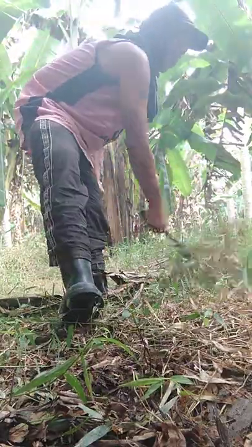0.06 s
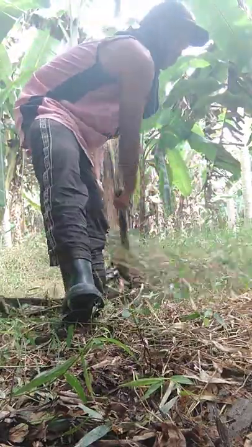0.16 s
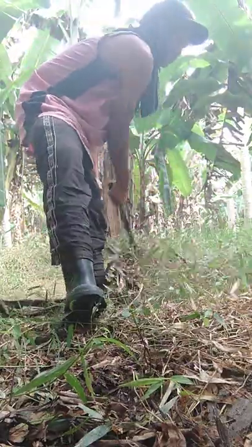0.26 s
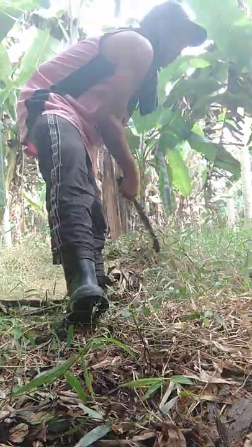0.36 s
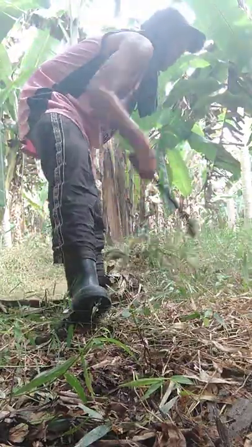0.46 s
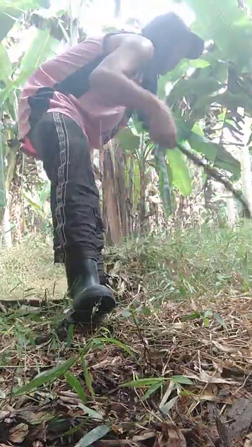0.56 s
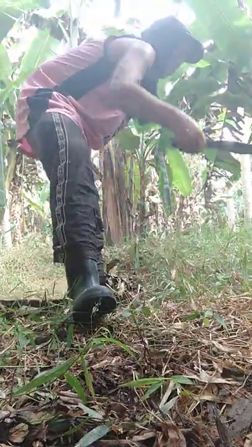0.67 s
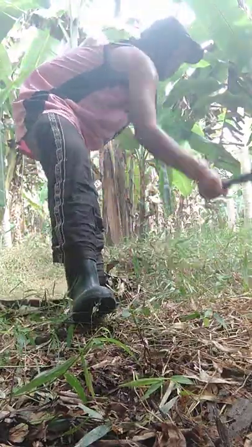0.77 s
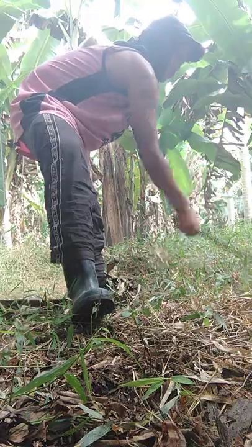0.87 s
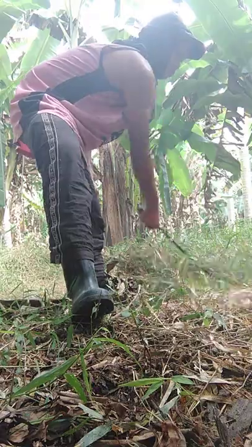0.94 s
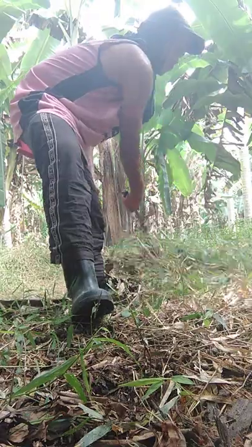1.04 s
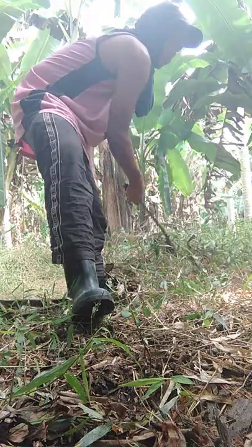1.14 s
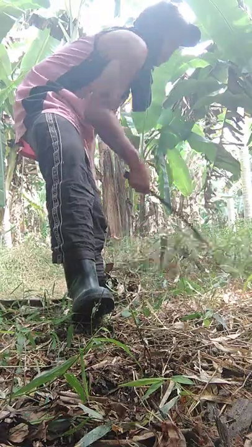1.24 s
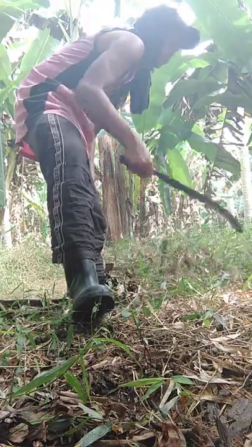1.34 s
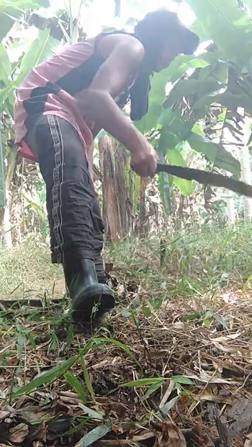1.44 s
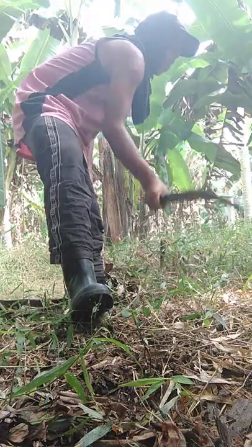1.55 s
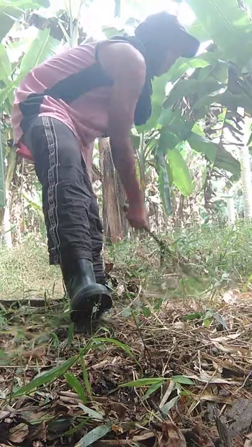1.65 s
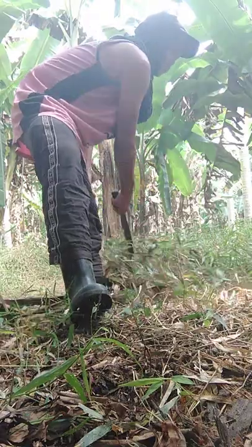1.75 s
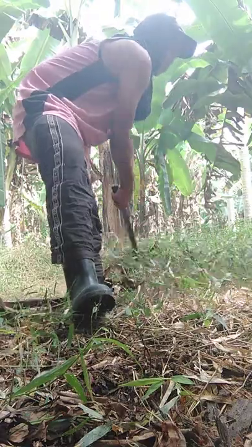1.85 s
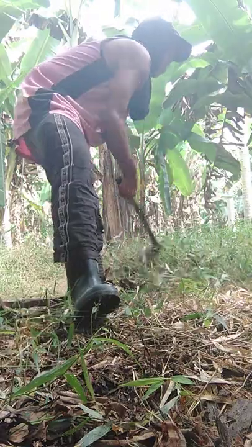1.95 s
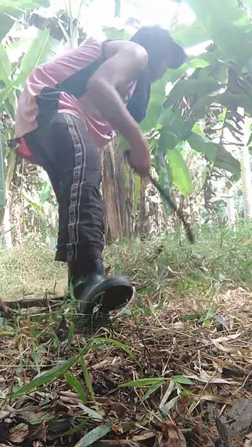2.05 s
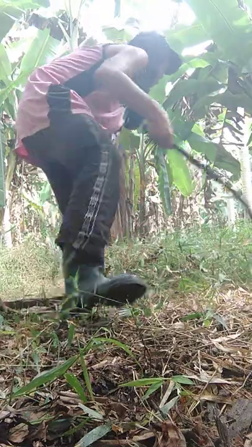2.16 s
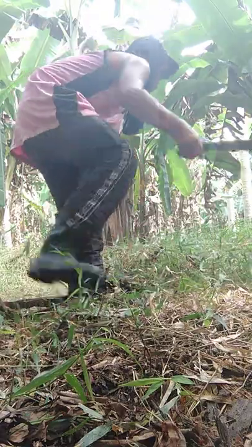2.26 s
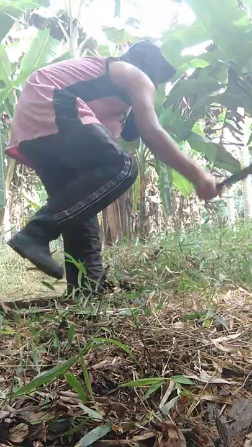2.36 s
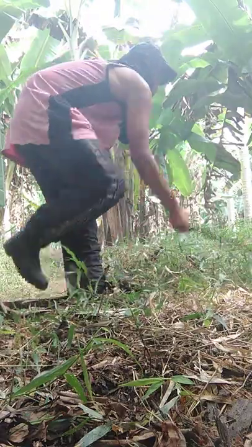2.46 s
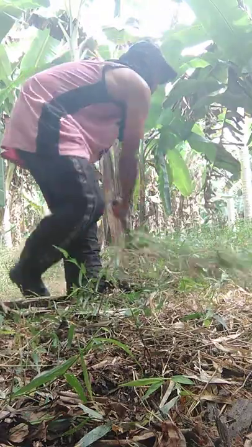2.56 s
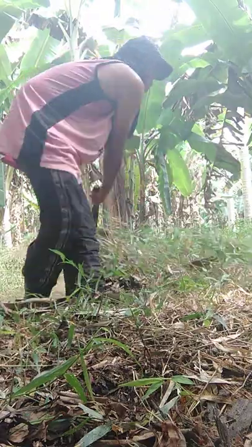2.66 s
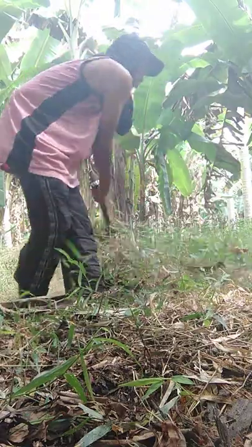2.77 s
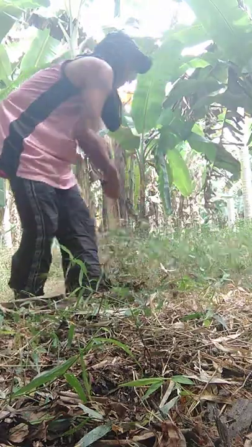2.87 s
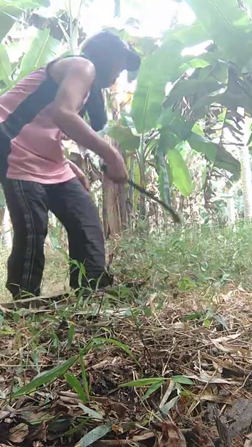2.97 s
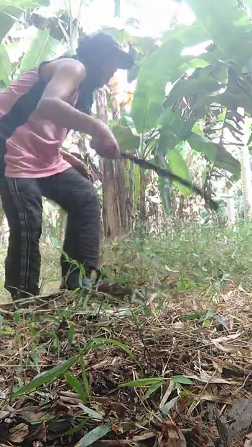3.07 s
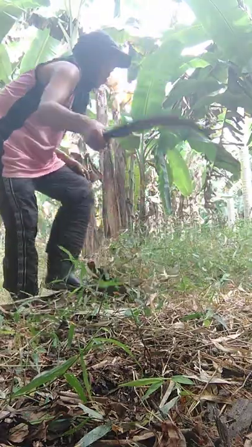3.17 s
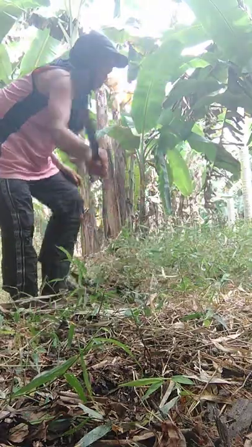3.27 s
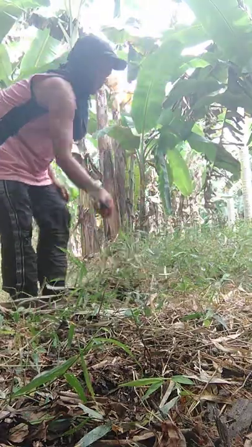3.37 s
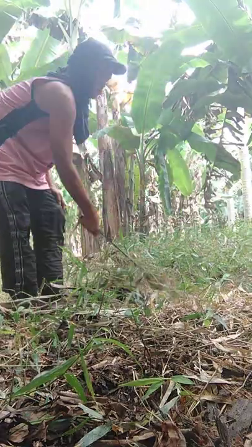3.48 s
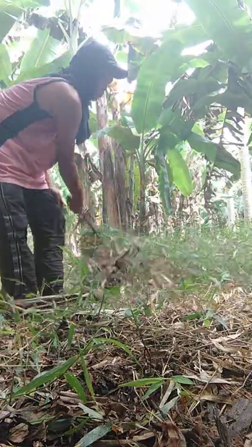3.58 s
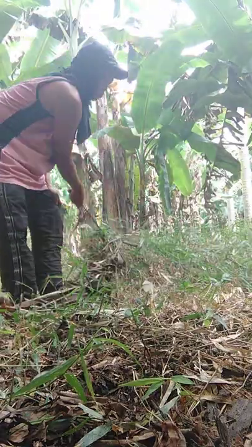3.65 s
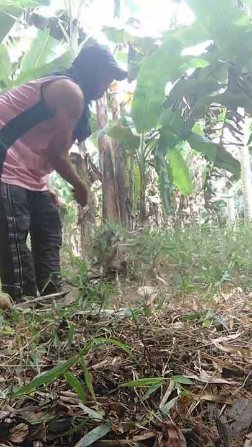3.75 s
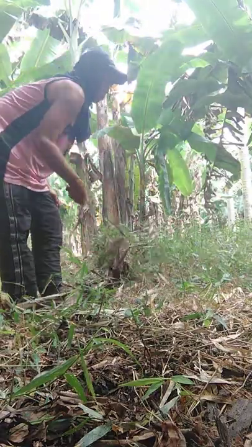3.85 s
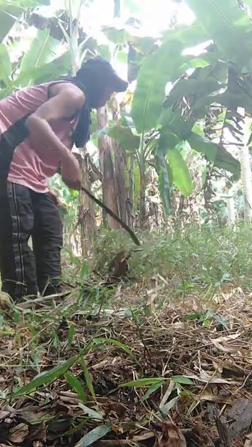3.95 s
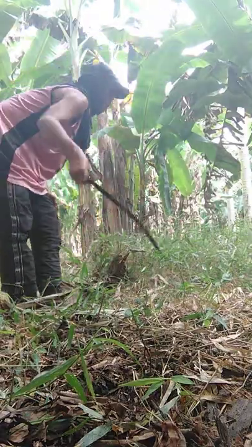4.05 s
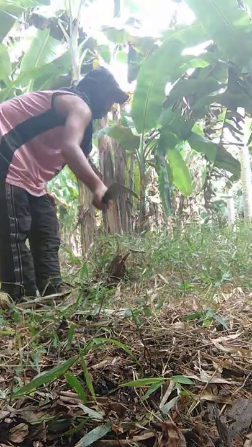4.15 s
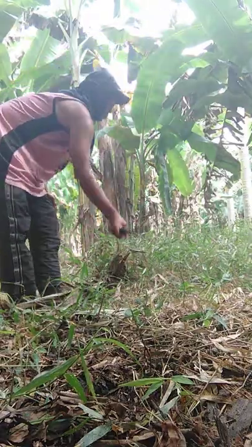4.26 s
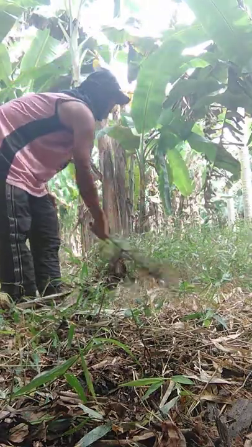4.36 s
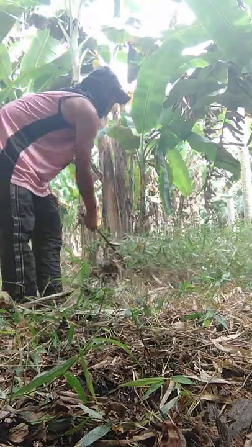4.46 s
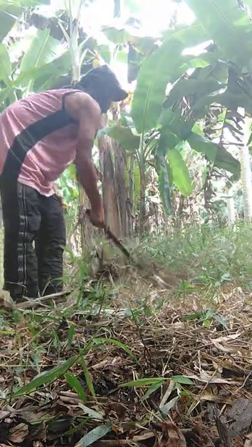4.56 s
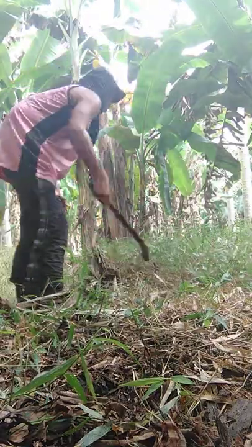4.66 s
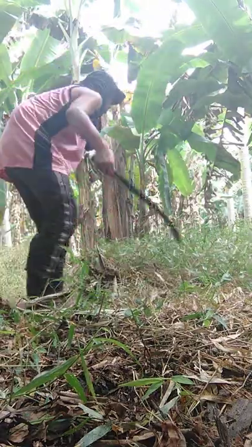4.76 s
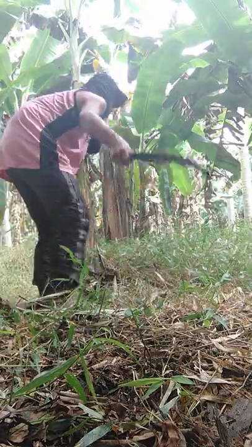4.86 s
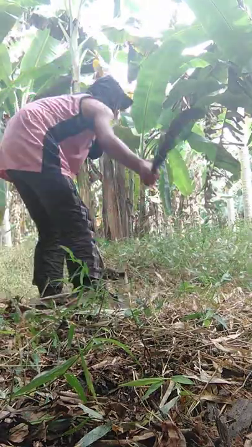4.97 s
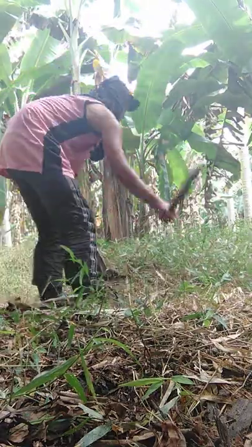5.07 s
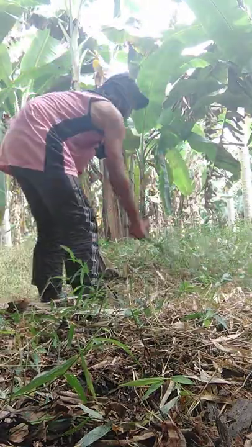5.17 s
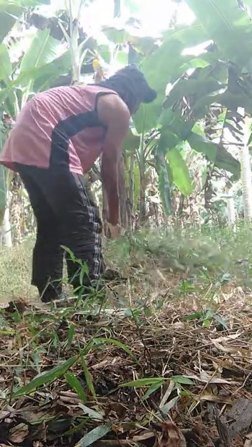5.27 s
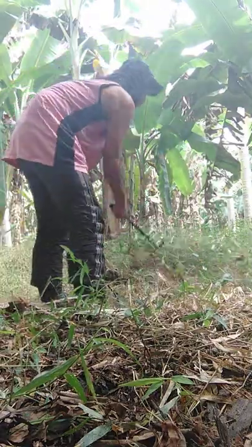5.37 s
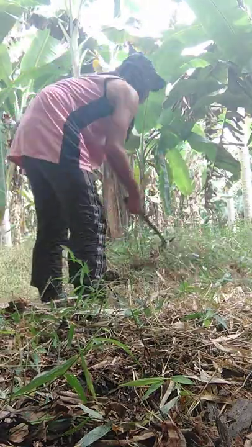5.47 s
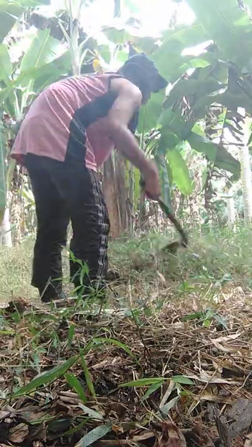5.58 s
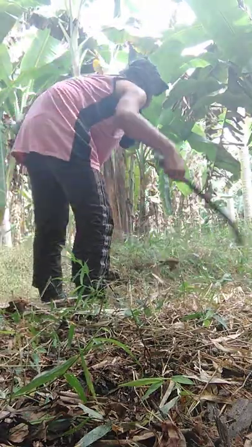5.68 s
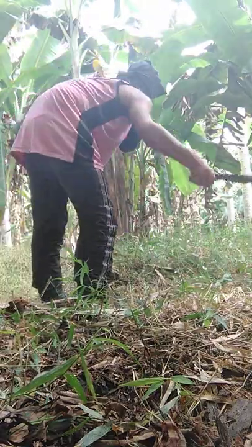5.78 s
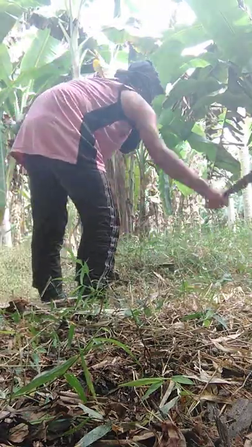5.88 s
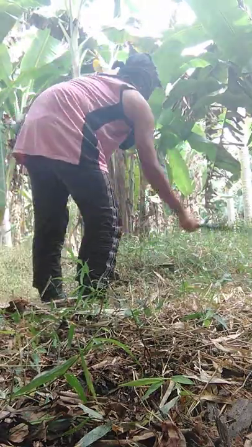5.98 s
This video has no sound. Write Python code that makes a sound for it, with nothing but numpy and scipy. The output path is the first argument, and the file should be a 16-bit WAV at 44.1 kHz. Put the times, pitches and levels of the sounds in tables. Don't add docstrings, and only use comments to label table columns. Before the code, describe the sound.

Close to the ground, crisp swishing chops crunch through dry grass, separated by faint rustles, boot shuffles and two brief insect whines.

```python
import sys
import numpy as np
from scipy import signal
from scipy.fft import rfft, irfft
from scipy.io import wavfile
from scipy.ndimage import uniform_filter1d

SR = 44100
rng = np.random.default_rng(int(sys.argv[2]) if len(sys.argv) > 2 else 0)


def to_linear_factor(level_db):
    exponent = np.asarray(level_db, float) / 20
    return 10 ** exponent


def file_out(sig):
    cols = np.atleast_2d(sig).T
    lim = np.clip(cols, -1, 1)
    pcm = np.round(lim * 32767).astype(np.int16)
    wavfile.write(sys.argv[1], SR, pcm)


N = 265482
STEP, RUN_IN = 40, 2000

# (frequency [Hz], level [dB per Hz])
OPEN_AIR = [(60, -16), (150, -8), (300, -12.5), (800, -23), (1500, -26), (4000, -23.5), (7500, -22),
            (9000, -33), (15500, -43.5)]
# (time [s], level [dB], length [s])
GUSTS = [(0.242, -45.5, 0.086), (0.52, -64.5, 0.036), (0.846, -67.5, 0.053), (0.997, -65, .06),
         (1.51, -67, 0.027), (1.797, -53.5, 0.066), (2.476, -69, 0.029), (2.63, -47, 0.044),
         (3.594, -52.5, 0.044), (3.985, -59, 0.056), (4.363, -64.5, .04), (4.47, -59.5, 0.069),
         (4.925, -67, 0.064), (5.05, -65, .05), (5.232, -59.5, 0.071), (5.33, -66, 0.067),
         (5.846, -66, .04), (5.919, -64, 0.034)]
# (start [s], length [s], level [dB], sag [dB/s],
# brightness [dB])
LEAVES = [(.0, 0.0044, -59, 7, 6), (.05, 0.093, -57.5, -60, 1.5), (.1, 0.0064, -44, 10, 0.5),
          (.38, 0.26, -46.5, 42.5, -0.5), (.973, .006, -45, 6.5, -2), (2.563, .03, -61, 5, 15.5),
          (1.22, 0.27, -47.5, 34.5, -1.5), (1.737, 0.013, -55.5, -100, 6.5), (1.96, 0.24, -51, 48.5, 0.5),
          (2.23, 0.059, -61.5, 4.5, -3.5), (2.85, 0.15, -51, 17, 2), (2.99, 0.093, -51, 16, 4.5),
          (3.1, 0.088, -56.5, 4.5, 3.5), (3.318, 0.011, -46, 2, -6.5), (.66, 0.055, -69, 82, 8.5),
          (4.06, 0.039, -64, 80, 1), (3.8, 0.22, -50.5, 24, -2.5), (4.413, 0.029, -57.5, -300, 9),
          (4.62, .16, -52.5, 33, 1.5), (4.99, 0.038, -63.5, 5.5, -10), (5.278, .008, -57, 5, 4),
          (5.46, 0.11, -50.5, 32, -1.5), (5.57, .12, -52, 22, 4), (5.72, 0.076, -66, 61, 14.5),
          (.15, .03, -42.5, 50, 7), (2.61, 0.14, -43, 70, 10), (2.49, .04, -71, 20, 16),
         (2.26, 0.065, -68.5, 20, 10), (4.96, .05, -68.5, 5, 5), (2.74, 0.087, -51.5, 40, 3),
         (3.6, .02, -34.5, 49.5, -0.5), (5.05, .1, -54, 20, -9), (5.3, .04, -42, 50, 7.5),
         (.44, .08, -57.5, 20, -15), (2, .004, -61, 5, 3)]
# (start [s], length [s], level [dB], sag [dB/s], weight [dB])
BOOTS = [(.98, 0.14, -48, 40.5, 11), (1.5, 0.12, -64, 40, 3.5), (2.563, .03, -64, 7, 11),
         (1.737, .015, -61.5, 9, 9), (4.415, .015, -61.5, -200, 7.5), (3.12, .01, -66, 5, 4),
         (3.19, 0.062, -53, 10, -9), (3.26, .11, -55, -23, -14), (2.718, .1, -58, 40, 7),
         (1.885, .08, -58.5, 40, 7), (3.38, .13, -53, 8, -6.5), (3.7, 0.078, -56.5, 45, 7.5),
         (4.5, 0.12, -58, 57, 6), (5.0, 0.11, -62, 18.5, 4.5)]
# (hiss [dB/s], stems [dB/s], thud [dB/s])
AGEING = (16.5, -16.5, -19.5)
# (contact [s], level at contact [dB], time on to deepest cut [s], level there [dB],
# dying [dB/s])
STROKES = [
    (0.149, -32, 0.063, -24, 134.5),
    (.981, -34.5, .12, -33.5, 114.5),
    (1.757, -35.5, 0.064, -31, 117),
    (2.605, -31, 0.072, -31.5, 120),
    (3.566, -36.5, 0.05, -26.5, 112),
    (4.433, -42, 0.025, -31.5, 97.5),
    (5.028, -48.5, 0.073, -47.5, 141),
    (5.292, -33.5, 0.045, -29, 158),
]
# (frequency
# [Hz], level [dB per Hz])
WEED_COLOUR = [(71, -41), (120, -21.5), (180, -22.5), (225, -4.5), (339, -7), (488, -3), (598, -8.5),
               (780, -7.5), (1190, -19), (3510, -6), (5720, -3), (7450, 1), (12400, -24.5), (15500, -20.5)]
# (time [s], peak [dB], pitch [Hz])
SNAPS = [(0.0616, -35, 7680), (0.09, -34, 7140), (0.107, -34, 4230), (0.5779, -37, 7100),
         (0.9865, -22.5, 3050), (1.0087, -23, 3060), (1.2411, -45, 7390), (1.504, -55, 7210),
         (1.758, -28.5, 7400), (2.2308, -64, 7530), (2.259, -52.5, 7560), (3.0096, -30.5, 6720),
         (3.14, -37, 7090), (3.1617, -38, 6860), (3.2772, -30.5, 7360), (3.3218, -32, 7600),
         (3.4531, -31.5, 7200), (3.478, -37.5, 2670), (3.5673, -17, 7360), (3.9102, -37, 7180),
         (4.427, -33, 6900), (5.0347, -32, 6360), (5.1294, -43, 7400)]
# (time [s], peak [dB], pitch [Hz])
THUDS = [(0.119, -47, 790), (0.143, -31, 244), (0.143, -29.5, 273), (0.982, -19, 910), (1.733, -38, 447),
         (1.75, -47, 291), (1.757, -25.5, 659), (2.56, -39.5, 776), (2.603, -30.5, 675),
         (3.119, -44.5, 530), (3.385, -44.5, 273), (3.379, -41, 590), (3.476, -39, 860),
         (3.565, -34.5, 310), (4.426, -35.5, 663), (4.44, -34.5, 256), (4.44, -36.5, 283),
         (5.008, -50, 456), (5.024, -65, 248), (5.024, -64, 525), (5.11, -49, 744), (5.288, -27, 484)]
# (start [s], level [dB], pitch [Hz], t60 [s])
RUSTLES = [(.195, -31.5, 3380, 0.34), (.98, -43, 1120, 0.36), (1.22, -68, 3500, 0.54),
           (1.54, -57.5, 2310, 0.089), (1.539, -60, 3260, .1), (1.598, -56.5, 5005, 0.11),
           (1.599, -61.5, 7700, 0.12), (2.119, -70, 1480, 0.17), (2.18, -62.5, 2620, 0.24),
           (2.18, -62.5, 1710, 0.089), (2.23, -57, 7600, 0.43), (2.261, -66, 3300, 0.53),
           (2.485, -64, 8500, 0.3), (1.2, -65, 8500, 0.15), (2.56, -55.5, 4515, .2), (3.05, -61, 2550, 1.0),
           (2.945, -48.5, 2480, 0.39), (3.118, -76, 550, 0.059), (3.19, -56, 5300, 0.29),
           (3.38, -55.5, 590, 0.38), (3.6, -45.5, 1700, 0.32), (4.845, -63.5, 2205, 0.35),
           (5.02, -63.5, 1550, 0.23), (5.59, -60.5, 2980, 0.37), (5.29, -35.5, 453, 0.18),
           (5.731, -61, 2300, 0.62), (5.765, -60.5, 4650, 0.28), (5.77, -66.5, 1750, 0.21),
           (2.93, -62, 1890, 0.47), (2.29, -68, 2050, 0.28)]
# (time [s], level [dB], wingbeat whine [Hz])
BUZZES = [
    [(4.12, -70, 7440), (4.156, -49.5, 7300), (4.238, -54, 7200), (4.242, -61, 7320), (4.3, -60.5, 7230),
     (4.4, -95, 7180)],
    [(4.84, -69, 7140), (4.85, -57, 7380), (5.0, -55, 6980), (5.016, -67, 7170), (5.03, -42, 7300)],
]
# (frequency [Hz], level [dB per Hz])
LEARNT = [(300, -93), (800, -100), (1180, -94.5), (1500, -104), (2000, -100), (2600, -102), (3500, -101),
          (4200, -94.5), (5100, -100), (6000, -83.5), (6600, -100), (8500, -102), (12300, -114),
          (15500, -124)]


def at_hz(points, hz):
    table = np.array(points)
    return np.interp(np.log(hz), np.log(table[:, 0]), table[:, 1])


def in_time(rows):
    s, *columns = np.transpose(rows)
    return [np.interp(np.arange(N) / SR, s, column) for column in columns]


def each_sample(slow):
    return np.interp(np.arange(N) / STEP, np.arange(len(slow)), slow)


def rms_one(x):
    return x / np.sqrt(np.mean(x ** 2) + 1e-20)


def slow_drift(rate_hz):
    r = np.exp(-2 * np.pi * STEP * rate_hz / SR)
    white = rng.standard_normal(N // STEP + 2 + RUN_IN)
    return rms_one(signal.lfilter([1], [1, -2 * r, r * r], white)[RUN_IN:])


def drift(rate_hz):
    return each_sample(slow_drift(rate_hz))


def band(x, low_hz, high_hz):
    return signal.sosfilt(signal.butter(2, [low_hz, high_hz], "band", fs=SR, output="sos"), x)


def bank(sources, gain_db):
    edges = np.geomspace(140, 17000, 22)
    out = np.zeros(N)
    for k, (low, high) in enumerate(zip(edges, edges[1:])):
        gain = each_sample(to_linear_factor(gain_db(np.sqrt(low * high))))
        out += gain * band(sources[k % 2], low, high)
    return out


def open_air(level_db=-76.5):
    colour = to_linear_factor(at_hz(OPEN_AIR, np.fft.rfftfreq(N, 1 / SR) + 1))
    return to_linear_factor(level_db) * rms_one(irfft(rfft(rng.standard_normal(N)) * colour, N))


def wind(breeze_db=-70.5, gust_drop_db=21):
    t = np.arange(0, N + STEP, STEP) / SR
    level = np.full(len(t), to_linear_factor(breeze_db))
    for s, db, length in GUSTS:
        level += to_linear_factor(db - gust_drop_db * np.abs(t - s) / length)
    rumble = band(band(rng.standard_normal(N), 72, 150), 49, 190)
    return np.interp(np.arange(N) / SR, t, level) * to_linear_factor(2.0 * drift(20)) * rms_one(rumble)


def settling(t, rows, base, moves, rise_db_per_s=1499, fall_db_per_s=221):
    power = np.zeros((4, len(t)))
    for s, length, level_db, sag, character_db in rows:
        age = t - s
        db = level_db + rise_db_per_s * np.minimum(age, 0) - sag * np.clip(age, 0, length)
        db -= fall_db_per_s * np.maximum(age - length, 0)
        colour = [0 * age]
        for part, move, ageing in zip(base, moves, AGEING):
            colour.append(part + move * character_db + ageing * np.clip(age, 0, 1))
        power += to_linear_factor(2 * (db + colour))
    return power


def strokes(t, approach_db_per_s=2600, contact_s=0.035):
    # (hiss, stems, thud) in dB against the leaf crackle
    at_contact, in_the_cut = (-4.5, -10, -2), (-7, -13.5, -12.5)
    power = np.zeros((4, len(t)))
    for s, contact_db, deep_s, deep_db, dying in STROKES:
        age = t - s
        db = np.interp(age, [0, deep_s], [contact_db, deep_db])
        db += approach_db_per_s * np.minimum(age, 0) - dying * np.maximum(age - deep_s, 0)
        fresh = np.exp(-np.maximum(age, 0) / contact_s)
        colour = [0 * age]
        for first, late in zip(at_contact, in_the_cut):
            colour.append(late + (first - late) * fresh)
        power += to_linear_factor(2 * (db + colour))
    return power


def motion():
    t = np.arange(N // STEP + 2) * STEP / SR
    power = 1e-13 + strokes(t)
    power += settling(t, LEAVES, base=(-3.4, -21, -27), moves=(0.95, -0.72, -0.4))
    power += settling(t, BOOTS, base=(-3, -6, 0), moves=(0.1, 0.25, 0.85))
    leaf_db, *others = 10 * np.log10(power)
    return [leaf_db] + [db - leaf_db for db in others]


def weeds(grains_per_s=5000, uneven_db=1.5, patchy_db=-0.54):
    leaf_db, hiss_db, stem_db, thud_db = motion()
    quiet_db = np.clip(-42 - leaf_db, 0, 20)
    share = each_sample(to_linear_factor(-0.3 * quiet_db))
    patches_db = patchy_db + 0.09 * quiet_db

    born = rng.random((2, N)) < grains_per_s * share * to_linear_factor(2.2 * drift(90)) / SR
    sizes = to_linear_factor(uneven_db * np.minimum(rng.exponential(1, (2, N)), 5))
    sizes *= rng.choice([-1, 1], (2, N))
    grains = rms_one(born * sizes / np.sqrt(share)) + 0.53 * rng.standard_normal((2, N))

    deep_db = thud_db + 7.5 - 0.55 * np.maximum(-48.5 - leaf_db - thud_db, 0)
    anchors = np.log([260, 600, 1800, 4000, 10000])      # Hz, one for each part
    parts = np.array([deep_db, thud_db + 7, stem_db + 15.0, 0 * leaf_db, hiss_db + 2.5])
    parts += leaf_db + 11

    def gain_db(hz):
        shares = [np.interp(np.log(hz), anchors, row) for row in np.eye(5)]
        return at_hz(WEED_COLOUR, hz) + np.dot(shares, parts) + patches_db * slow_drift(16)
    return bank(grains, gain_db)


def burst(hz, cycles):
    turns = np.arange(int(3 * cycles * SR / hz)) * hz / SR
    return np.sin(2 * np.pi * turns) * np.exp(-turns / cycles)


def blows(events, cycles, trim_db):
    out = np.zeros(N + SR)
    for s, db, hz in events:
        ring = to_linear_factor(db + trim_db) * burst(hz, cycles)
        start = round(s * SR)
        out[start:start + len(ring)] += ring
    return band(out[:N], 120, 15000)


def snaps():
    return blows(SNAPS, cycles=1.8, trim_db=2.5)


def crackle(trim_db=-12, t60=0.017):
    clicks = np.zeros(N)
    clicks[[round(s * SR) for s, db, hz in SNAPS]] = [to_linear_factor(db + trim_db) for s, db, hz in SNAPS]
    fade = signal.lfilter([1], [1, -to_linear_factor(-60 / (t60 * SR))], clicks + 1e-18)
    return fade * rms_one(band(rng.standard_normal(N), 3000, 8700))


def thuds():
    return blows(THUDS, cycles=1.9, trim_db=-4.5)


def rustles(width_hz=100, width_share=0.012, trim_db=-0.5):
    out, white = np.zeros(N), rng.standard_normal(N)
    for s, db, hz, t60 in RUSTLES:
        half = width_hz + width_share * hz
        i, edges = round(s * SR), (hz - half, hz + half)
        piece = white[i - RUN_IN:i + SR // 2]
        rough = rms_one(band(band(piece, *edges), *edges)[RUN_IN:])
        fade_db = -60 * np.arange(len(rough)) / SR / t60
        out[i:i + SR // 2] += rough * to_linear_factor(db + trim_db + fade_db)
    flutter = rms_one(uniform_filter1d(uniform_filter1d(white[::-1], size=300), size=300))
    return out * to_linear_factor(3.5 * flutter)


def insect(width_hz=85):
    out, s = np.zeros(N), np.arange(N) / SR
    for rows in BUZZES:
        db, hz = in_time(rows)
        on = np.clip(np.minimum(s - rows[0][0], rows[-1][0] - s) / 0.0049, 0, 1)
        phase = 2 * np.pi * np.cumsum(hz) / SR
        whine = drift(width_hz) * np.cos(phase) + drift(width_hz) * np.sin(phase)
        out += on * to_linear_factor(db) * whine
    return out


def scene():
    cutting = weeds() + snaps() + crackle() + thuds() + rustles()
    return (wind() + cutting + insect())[None]


def suppress(x, floor_db=-26.5, memory=0.9, ragged_db=5.0, close_db=-0.33, lowest_hz=130):
    frame, hop = 512, 128
    hz, s, frames = signal.stft(x, SR, nperseg=frame, noverlap=frame - hop)
    power = uniform_filter1d(uniform_filter1d(np.abs(frames) ** 2, size=3, axis=0), size=3, axis=1)
    wander = uniform_filter1d(rng.standard_normal((len(hz) // 3 + 1, len(s))), size=60, axis=1)
    wander = np.repeat(rms_one(wander), 3, axis=0)[:len(hz)]
    learnt_db = at_hz(LEARNT, hz + 1)[:, None] + ragged_db * wander
    excess = power / (to_linear_factor(2 * learnt_db) * SR / frame)

    gain, clean = np.ones_like(power), np.zeros(len(hz))
    last = np.full(len(hz), to_linear_factor(floor_db))
    closing = to_linear_factor(close_db)
    for k in range(len(s)):
        ratio = memory * clean + (1 - memory) * np.maximum(excess[:, k] - 1, 0)
        wanted = np.maximum(ratio / (1 + ratio), to_linear_factor(floor_db))
        clean = wanted ** 2 * excess[:, k]
        last = np.maximum(wanted, last * closing)
        gain[:, k] = last
    gain[hz < lowest_hz] = 1
    return signal.istft(frames * gain, SR, nperseg=frame, noverlap=frame - hop)[1][:N]


def roll_off(x):
    return signal.sosfilt(signal.butter(12, 16050, fs=SR, output="sos"), x)


def record(dry):
    x = suppress(dry[0]) + open_air()
    x = signal.sosfilt(signal.butter(3, 50, "high", fs=SR, output="sos"), x)
    x = signal.sosfilt(signal.cheby2(16, 60, 16120, fs=SR, output="sos"), x)
    return roll_off(x[None])


dry = scene()
out = record(dry)
file_out(out)
```